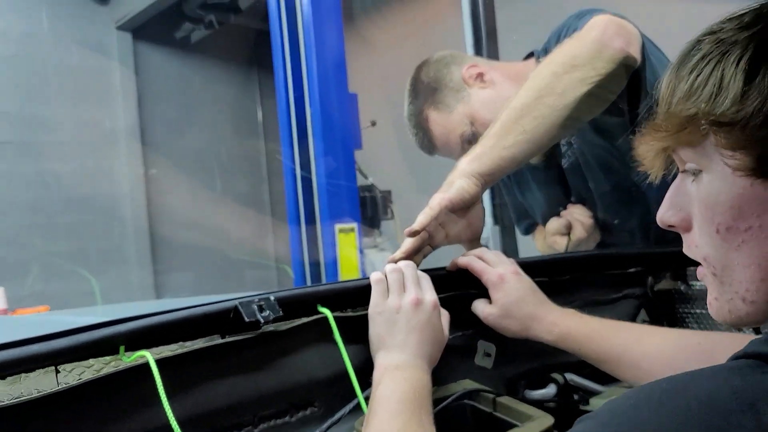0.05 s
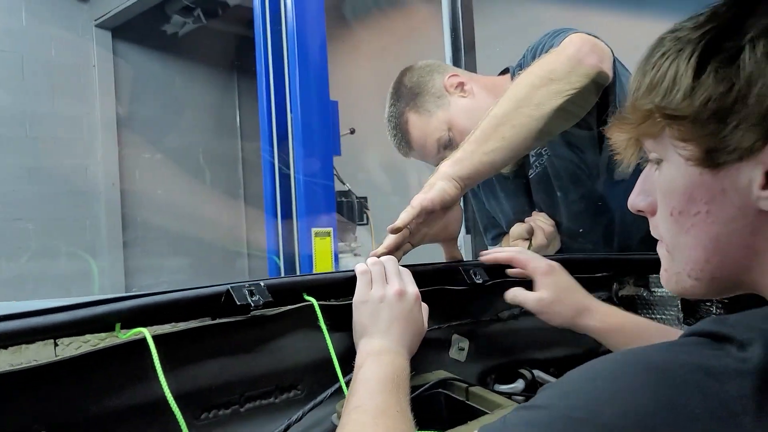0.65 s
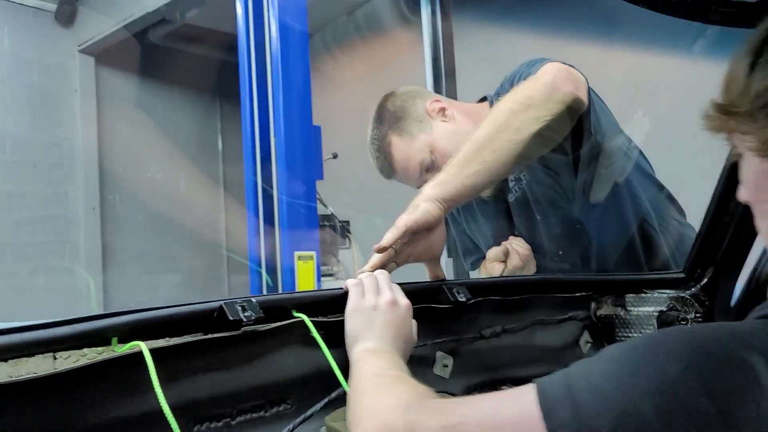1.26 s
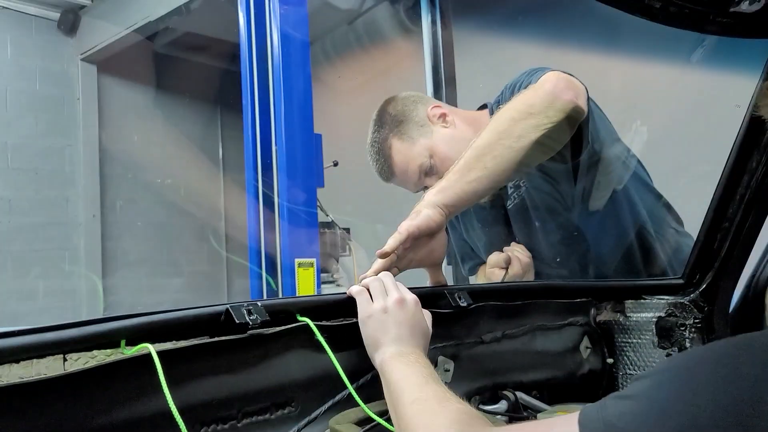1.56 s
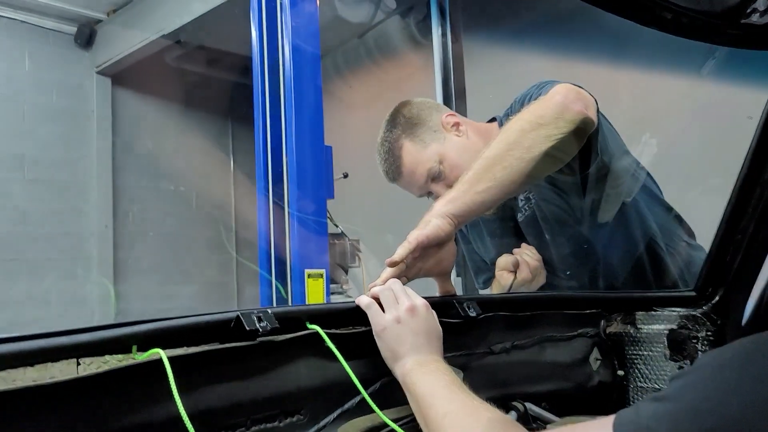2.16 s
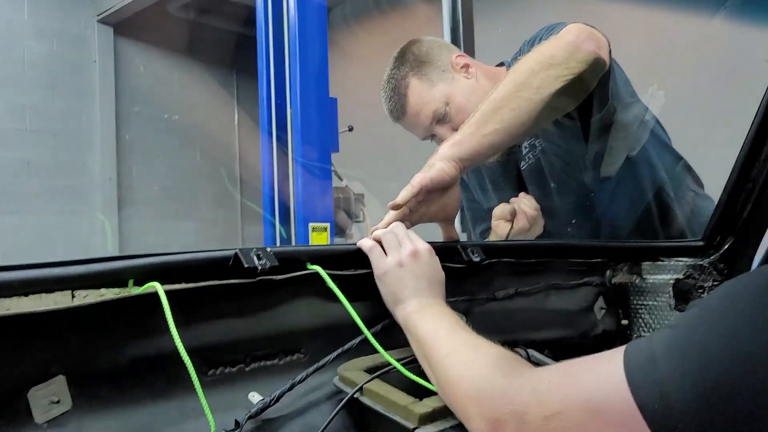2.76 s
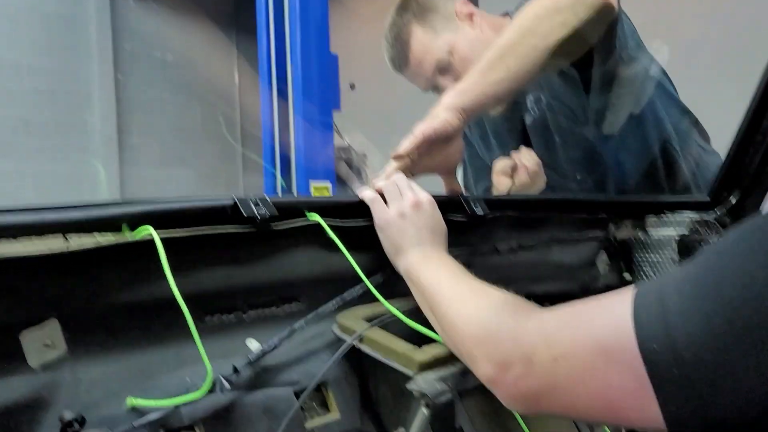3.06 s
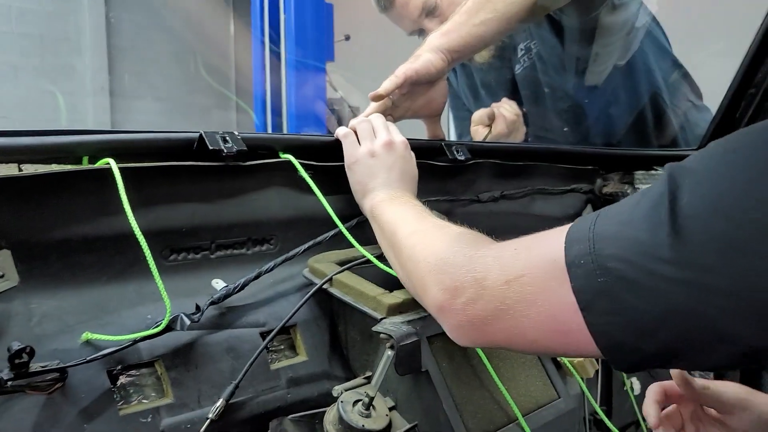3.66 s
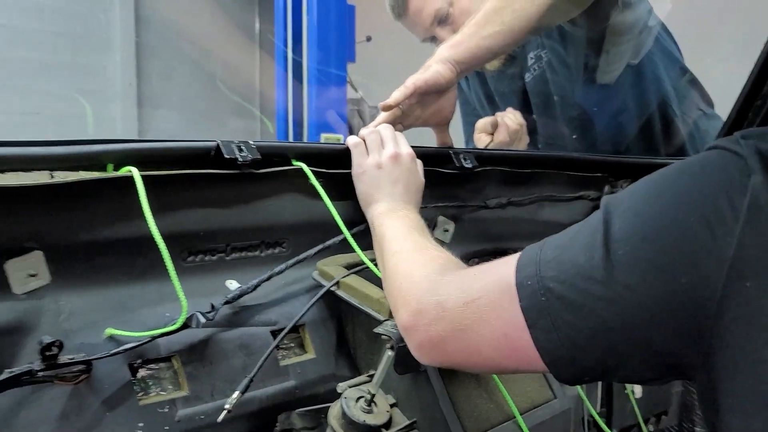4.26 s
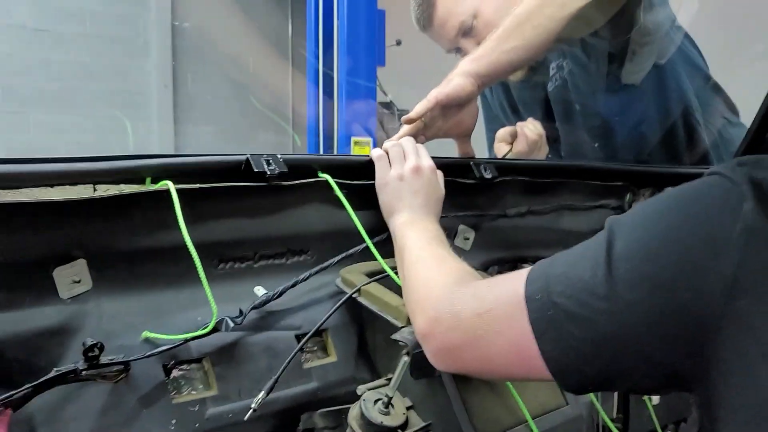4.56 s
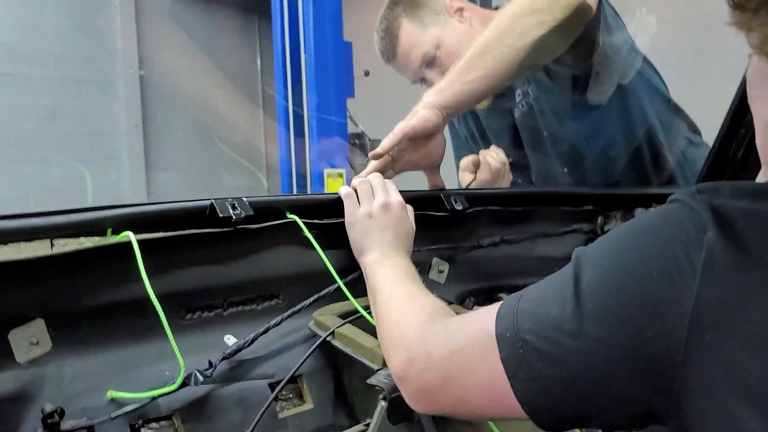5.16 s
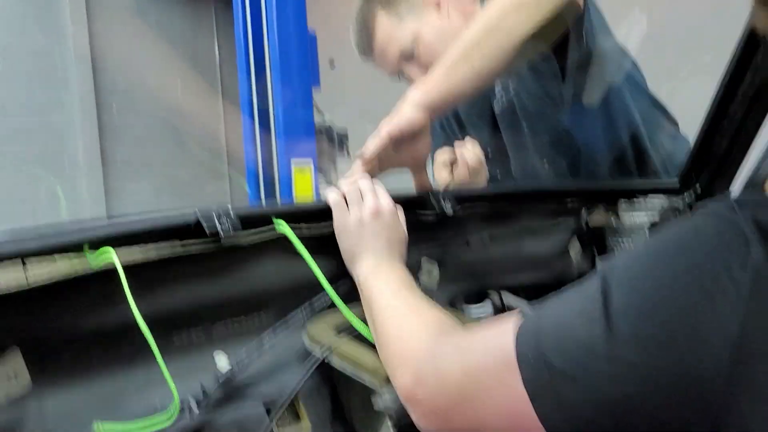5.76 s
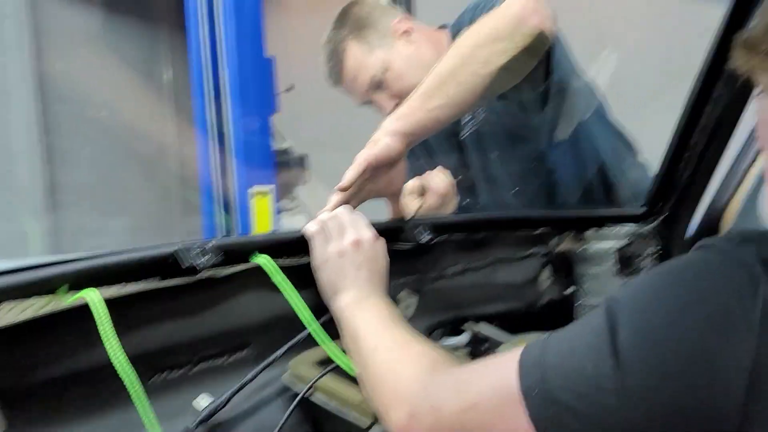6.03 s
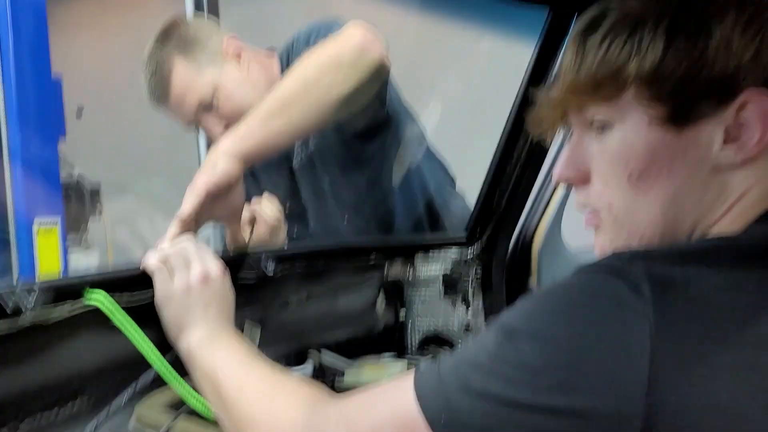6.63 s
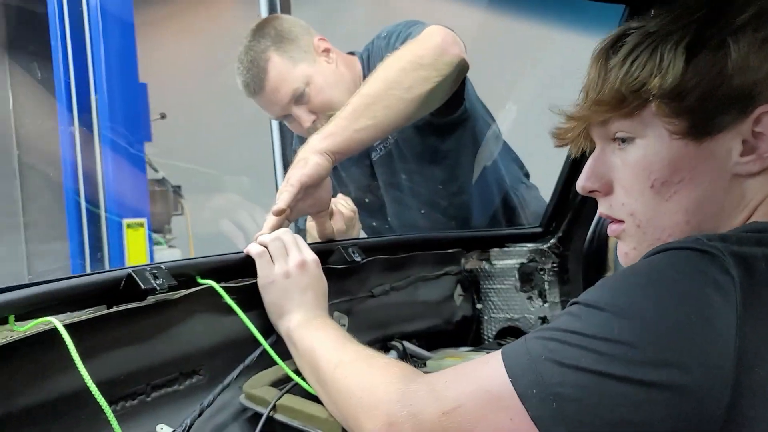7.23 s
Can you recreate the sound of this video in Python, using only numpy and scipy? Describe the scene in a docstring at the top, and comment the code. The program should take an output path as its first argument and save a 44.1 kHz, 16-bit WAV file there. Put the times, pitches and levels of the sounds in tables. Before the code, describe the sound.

A rubber seal is worked by hand onto a car windscreen, close to the microphone in a quiet workshop. Faint scratchy rubbing comes with ticks and small pops, then the pane gives a sharp, ringing knock. A finger slides over the left side of the microphone and presses it with a muffled bump. Softer scrapes, ticks and knocks follow, with low rumbles from the car body.

```python
"""Fitting a windscreen seal

A bare car body in a quiet workshop, heard from close by on a stereo microphone. Hands work a rubber
seal onto the edge of the glass: it rubs and scrapes in stick-slip strokes, ticks, and pops into its
seat. The pane knocks and rings; the body booms and rumbles as it is pushed. Early on, right at the
microphone, a finger slides over the left port and briefly presses on it."""
import sys
import numpy as np
from scipy import signal
from scipy.fft import rfft, irfft
from scipy.io import wavfile
from scipy.ndimage import uniform_filter1d

SR = 44100
rng = np.random.default_rng(int(sys.argv[2]) if len(sys.argv) > 2 else 0)


def to_wav(sig):
    """Store sig (one row per channel, or 1-D mono) as 16-bit WAV at the path in sys.argv[1].

    Samples outside -1..1 are clipped; the rate is SR.
    """
    pcm = np.clip(np.atleast_2d(sig), -1, 1) * 32767
    pcm = np.round(pcm).astype(np.int16)
    wavfile.write(sys.argv[1], SR, pcm.T)  # frames by channels


N = 325981
T = np.arange(N) / SR
RING_T = T[:SR * 3 // 4]  # time axis of one blow

# hiss spectrum of slipping skin: f/Hz, level/dB
SKIN_HISS = [(1500, -12), (4000, 11), (7500, 6), (9500, 0.5), (12000, 1.5), (16000, 0)]
# contact noise spectrum of a knock or pop: f/Hz, level/dB
CONTACT = [(25, -9.5), (90, 9.5), (200, 15.5), (700, -8.5), (1500, 8.5), (3300, -1), (5500, -9.5),
           (10000, -27.5)]


def rubbing():
    """Rubber on glass: a firm grip drags the rubber body along, a light one lets the skin slip and hiss."""
    # strokes: middle t/s, half length/s, level/dB, grip 0-1
    strokes = [(1.073, 0.084, -65.5, 0.45), (2.41, 0.094, -76, 1), (2.784, 0.018, -69.5, 0.3),
               (3.21, 0.25, -80, 0.29), (3.45, 0.15, -76, 1), (3.65, 0.052, -82.5, 0.05),
               (3.788, 0.059, -67.5, 0.18), (4.41, 0.029, -66.5, 0.98), (4.486, 0.032, -83, 0.06),
               (4.719, 0.061, -62, 0.46), (5.105, 0.047, -68, 0.55), (5.349, 0.071, -64, 0.4),
               (5.646, 0.022, -66.5, 0.6), (5.763, 0.067, -63.5, 0.46), (6.18, 0.074, -65, 0.54),
               (6.487, 0.077, -71, 0.85), (7.173, 0.24, -73, 0.64)]
    # spectrum of rubber on glass: f/Hz, level/dB
    rub_spectrum = [(400, -7), (1000, -1), (1500, 1), (3000, 0.5), (4300, -2.5), (6500, -6.5), (9000, -18),
                    (14000, -53)]
    # spectrum of the dragged rubber body: f/Hz, level/dB
    drag_spectrum = [(190, -29), (280, 4.5), (450, 12), (720, -1.5), (1300, -2), (3000, -20), (8000, -51)]
    friction, drag, skin = np.zeros((3, N))
    for s, half, db, grip in strokes:
        stroke = amp(db) * swell(s, half, shape=2.04)
        friction += stroke
        drag += stroke * amp(-13 + 20.5 * grip)
        skin += stroke * amp(13.5 - 52 * grip)
    rub = friction * colour(patchy(slips(16000, 0.42, 1.0, 0.04), patch_db=1.7), rub_spectrum)
    body = drag * colour(slips(4000, 0.98, 2.6, 0.93), drag_spectrum)
    hiss = skin * colour(patchy(slips(16000, 1.5, 1.0, 0.12), patch_db=4.0), SKIN_HISS)
    return rub * pan(-2.5) + body + hiss * pan(2.0)


def scrapes():
    """Quick slides of the rubber rasp, and some ring its hollow section."""
    # scrapes: middle t/s, level/dB, half length/s, centre f/Hz, hollow share 0-1, left over right/dB
    slides = [(1.034, -47, 0.013, 2380, 0, 3), (2.22, -61, 0.14, 2000, 0, 5),
              (2.368, -62.5, 0.085, 1900, 0, -5.5), (2.854, -68.5, 0.069, 2000, 0.24, -8),
              (3.409, -62, 0.021, 1920, 0, 1), (4.417, -56, 0.013, 2870, 0.65, -10.5),
              (5.774, -59.5, 0.048, 3250, 0.1, -5), (5.921, -63.5, 0.028, 3040, 0.1, -2.5),
              (5.99, -68, 0.016, 3000, 0.04, 16.5), (6.51, -65, 0.035, 1920, 0.3, -0.5)]
    # resonances of the hollow seal: f/Hz, width/Hz, level/dB
    seal_modes = [(450, 62, 0.5), (1222, 30, 8.5), (1840, 100, 6), (3160, 130, -6), (4100, 120, -8.5),
                  (6100, 700, -7.5), (7360, 550, -19)]
    hz = np.fft.rfftfreq(N, 1 / SR)
    grit = slips(per_s=9000, spread_db=0.5, clump_db=0.63, same=0.59)
    section = sum(amp(db) / (1 + ((hz - f) / (width / 2)) ** 2) for f, width, db in seal_modes)
    hollow = unit(irfft(rfft(grit) * section, N))
    out = np.zeros((2, N))
    for s, db, half, f, share, side_db in slides:
        rasp = colour(grit, [(f / 6, -17), (f / 1.12, -3), (f * 1.03, 0), (f * 1.77, -15), (f * 7, -48)])
        out += amp(db) * swell(s, half) * unit(share * hollow + (1 - share) * rasp) * pan(side_db)
    return out


def pops():
    """The seal drops into its seat with a puff of contact noise and a damped resonance."""
    # pops: t/s, level/dB, f/Hz, contact noise against the ring/dB
    seatings = [(0.549, -53, 379, -10), (.582, -51.5, 298, -12.5), (1.1479, -39, 486, -1.5),
                (1.212, -54, 510, -10), (1.241, -47, 376, -7.5), (1.311, -57, 540, -1),
                (1.719, -58, 395, -2), (2.551, -54.5, 248, -24), (3.478, -51.5, 846, -8),
                (4.356, -61, 428, 2.5), (5.01, -57.5, 354, -2.5)]
    decay_cycles = 46  # so low pops last longer
    out = np.zeros((2, N))
    for s, db, hz, contact_db in seatings:
        puff = soften(colour(noise(len(RING_T), 0.1), CONTACT), 5800)
        contact = amp(contact_db) * puff * dying(0.087, 0.0012)
        add(out, s, amp(db) * (damped(hz, decay_cycles / hz) + contact))
    return out


def ticks():
    """Nails and the lip of the seal snap on the glass."""
    # ticks: t/s, tone level/dB, f/Hz, t60/s, snap level/dB, left over right/dB
    flicks = [(0.104, -62, 1760, 0.24, -69, 3), (0.1389, -45.5, 2880, 0.035, -52, 4.5),
              (1.1486, -42, 2850, 0.039, -43, 5), (3.385, -62, 2340, 0.045, -83, 2),
              (3.464, -86, 3000, 0.11, -59, 1), (4.305, -57.5, 2880, 0.037, -86, -7),
              (6.559, -60, 5460, 0.015, -66, 6), (6.722, -79, 7000, 0.016, -61.5, -4),
              (7.25, -66.5, 6500, 0.21, -63, -1.5)]
    out = np.zeros((2, N))
    for s, db, hz, t60, snap_db, side_db in flicks:
        tone = colour(noise(len(RING_T), 0.17), [(hz / 2, -32), (hz, 0), (hz * 1.71, -28), (hz * 3, -45)])
        snap = colour(noise(len(RING_T), 0.12), [(500, 21), (4000, 5.4), (11000, 5.8), (16000, 2.5)])
        add(out, s, (amp(db) * tone + amp(snap_db) * snap) * dying(t60, 0.00013) * pan(side_db))
    return out


def knocks():
    """The pane bumps against its frame; a soft contact leaves out the high modes."""
    # knocks: t/s, level/dB, contact hardness as cutoff f/Hz, thud gain/dB
    blows = [(.153, -41.5, 2350, -14), (.855, -49.5, 1660, -9.5), (1.369, -29.5, 17000, -10.5),
             (3.894, -47.5, 1070, -14), (4.264, -59, 930, -10), (5.006, -55.5, 1250, -2)]
    # modes of the pane: f/Hz, level/dB, t60/s
    pane_modes = [(540, -11.5, 0.2), (622, -9, 0.32), (691, -8, 0.23), (744, -4, 0.09), (780, -18.5, 0.065),
                  (1317, -4.5, 0.13), (1385, -6.5, 0.042), (1490, -1, 0.066), (1920, -11, 0.13),
                  (2290, -5, 0.079), (3260, -2, 0.034)]
    # modes of the frame under it: f/Hz, level/dB, t60/s
    frame_modes = [(83, 2.5, 0.47), (105, 4, 0.21), (118, 4, 0.1), (186.5, -11, 0.75)]
    out = np.zeros((2, N))
    for s, db, hard_hz, thud_db in blows:
        crack = amp(-6.0) * colour(noise(len(RING_T), 0.73), CONTACT) * dying(0.15, 0.00063)
        glass = amp(-2.5) * ring(clusters(pane_modes), rise=0.0019, scatter=1.23)
        thud = amp(thud_db) * ring(frame_modes, rise=0.0073, scatter=0.2)
        add(out, s, amp(db) * (soften(glass + crack, hard_hz) + thud))
    return out


def bodywork():
    """The car body answers the pushing with sheet metal booms and dull thumps."""
    # pushes on a panel: t/s, level/dB
    booms = [(.235, -51.5), (4.601, -65.5)]
    # modes of that panel: f/Hz, level/dB, t60/s
    panel_modes = [(177, 2, 0.82), (268.4, -6, 0.65)]
    # thumps of the body: t/s, level/dB, f/Hz, t60/s
    thumps = [(1.243, -47.5, 108, 0.35), (5.021, -38, 41.3, 0.42)]
    out = np.zeros((2, N))
    for s, db in booms:
        add(out, s, sum(amp(db + mode_db) * damped(hz, t60) for hz, mode_db, t60 in panel_modes))
    for s, db, hz, t60 in thumps:
        add(out, s, amp(db) * damped(hz, t60))
    return out


def finger_slide():
    """Handling noise: skin creeps over the left port in short pushes; the right hears only a trace."""
    # pushes: middle t/s, half length/s, level/dB
    pushes = [(1.546, 0.0079, -62), (1.672, 0.04, -56.5), (1.929, .023, -54.5), (2.075, 0.028, -53.5),
              (2.146, 0.016, -45), (2.271, 0.025, -53.5), (2.573, 0.015, -61)]
    # spectrum of skin on the port: f/Hz, level/dB
    slide_spectrum = [(400, -23), (1000, -17), (1600, 1.5), (2900, 4.5), (5200, -1.5), (6500, -11),
                      (8200, -12.5), (10500, -46)]
    creep = amp(-62) * held(1.4, 2.1, rise_db_per_s=700, fall_db_per_s=700)
    slide = creep + sum(amp(db) * swell(s, half) for s, half, db in pushes)
    grit = patchy(slips(16000, 0.98, 0.52, 0.16), patch_db=2.5)
    hiss = amp(-60) * (slide / amp(-53)) ** 1.47  # faster sliding is brighter
    return (slide * colour(grit, slide_spectrum) + hiss * colour(grit, SKIN_HISS)) * amp([[0], [-16]])


def finger_press():
    """The finger presses on the left port and traps air in it."""
    # presses: t/s, hold/s, level/dB, rise/(dB/s)
    presses = [(2.154, 0.075, -30, 432), (2.56, 0.011, -64.5, 1208)]
    # spectrum of the covered port: f/Hz, level/dB
    press_spectrum = [(15, -23), (50, 1), (110, -5.5), (165, -11.5), (420, -11), (1000, -18), (1450, -12),
                      (2900, -19.5), (3600, -29.5), (8000, -50.5), (16000, -59.5)]
    # pressure pulses as the port is sealed: t/s, level/dB, half length/s
    bumps = [(2.1512, -13.5, 0.0018), (2.169, -17.5, 0.0034)]
    air = colour(slips(12000, 0.88, 0.3, 0.98)[0], press_spectrum)
    out = np.zeros((2, N))
    for s, hold, db, rise in presses:
        squeeze_db = 10 * swell(s, 0.0097)  # trapped air rushes out as the press lands
        out[0] += amp(db + squeeze_db) * held(s, s + hold, rise, fall_db_per_s=384) * air
    for s, db, half in bumps:
        out[0] -= amp(db) * (1 - ((T - s) / half) ** 2) * swell(s, half)
    return out


def cabin(x, positions=4):
    """Glass and bare metal close by make the rubber sound hollow, shifting as the hands move."""
    turn_hz = 0.4447
    fades = (np.maximum(np.cos(2 * np.pi * (turn_hz * T + k / positions)), 0) for k in range(positions))
    return sum(reflections(x * fade ** 1.5) for fade in fades)


def reflections(x):
    """Direct sound and quick echoes for one position of the hands."""
    t = T[:SR // 40]
    taps = rng.standard_normal((2, len(t))) * (rng.random(len(t)) < 1500 / SR) * np.exp(-t / 0.0063)
    taps = 1.64 * taps / np.linalg.norm(taps, axis=1, keepdims=True)
    taps[:, 0] = 1  # straight path to the microphone
    return signal.oaconvolve(x, taps / np.linalg.norm(taps[0]), axes=1)[:, :N]


def workshop(x):
    """Diffuse tail from the walls farther off, each band dying at its own speed."""
    # reverberation time: f/Hz, t60/s
    decay = [(100, 0.98), (2000, 0.69), (15000, 0.5)]
    taps = rng.standard_normal((2, SR)) * (rng.random((2, SR)) < 3000 / SR) * (T[:SR] > .006)
    hz, t, bands = signal.stft(taps, SR, nperseg=256)
    tail = signal.istft(bands * amp(-60 * t / read(decay, hz)[:, None]), SR, nperseg=256)[1]
    return signal.fftconvolve(x, tail / np.linalg.norm(tail[0]), axes=1)[:, :N]


def rumble():
    """The car body rumbles low as weight shifts against it."""
    # leans: middle t/s, half length/s, level/dB
    leans = [(3.1, 0.028, -62.5), (4.176, 0.14, -56.5), (4.801, 0.1, -57.5), (5.407, 0.085, -52.5),
             (6.843, 0.055, -56.5), (7.281, 0.053, -56)]
    # spectrum of the swaying body: f/Hz, level/dB
    body_spectrum = [(20, -16), (45, 0.5), (68, -7.5), (100, -27.5), (200, -31.5), (500, -103)]
    sway = sum(amp(db) * swell(s, half) for s, half, db in leans)
    return sway * colour(noise(N, 0.95), body_spectrum)


def room_tone():
    """Steady air of the quiet workshop."""
    # spectrum of the air: f/Hz, level/dB
    air_spectrum = [(20, -8), (45, 3.5), (70, 1), (155, -17), (350, -16.5), (1050, -28), (2600, -26),
                    (3500, -33.5), (5200, -33.5), (9400, -46.5), (16000, -47.5)]
    return amp(-64) * colour(noise(N, 0.47), air_spectrum) * pan(0.65)


def slips(per_s, spread_db, clump_db, same):
    """Stick-slip friction: a dense train of tiny clicks of uneven size, bunched in clumps."""
    size = amp(spread_db * np.minimum(rng.exponential(1, (3, N)), 4))
    clicks = size * rng.standard_normal((3, N)) * (rng.random((3, N)) < per_s / SR)
    clumps = unit(uniform_filter1d(uniform_filter1d(rng.standard_normal(N), size=300), size=200))
    return unit(pair(clicks, same) * amp(clump_db * clumps))


def patchy(x, patch_db):
    """Skin catches and lets go unevenly: the colour of the friction shifts in short patches."""
    bands = signal.stft(x, nperseg=512)[2]
    patches = uniform_filter1d(rng.standard_normal(bands.shape[1:]), size=11, axis=0)
    patches = unit(uniform_filter1d(patches, size=6, axis=1))
    return unit(signal.istft(bands * amp(patch_db * patches), nperseg=512)[1][:, :N])


def clusters(modes, count=5, split=0.0534):
    """The pane rests loosely on the seal, so each mode splits into close partials that beat."""
    return [(hz * (1 + split * rng.uniform(-1.04, 1)), db - 10 * np.log10(count), t60)
            for hz, db, t60 in modes for _ in range(count)]


def ring(modes, rise, scatter):
    """Dying modes; each reaches the two ports with its phase scattered (radians)."""
    return sum(amp(db) * dying(t60, rise)
               * np.sin(2 * np.pi * hz * RING_T + scatter * rng.standard_normal((2, 1)))
               for hz, db, t60 in modes)


def damped(hz, t60):
    """One resonance and a dull crowd of modes round it."""
    spectrum = [(hz / 4, -30), (hz, 0), (hz * 2.16, -10), (hz * 5, -55), (SR / 2, -100)]
    crowd = amp(-8.0) * colour(noise(len(RING_T), 1.0), spectrum)
    rise = .5 / hz  # half a cycle
    return ring([(hz, 0, t60)], rise, scatter=0.14) + crowd * dying(t60, rise)


def swell(s, half, shape=2):
    """Bell-shaped envelope of a stroke that speeds up and slows down again."""
    return np.exp(-np.minimum(abs((T - s) / half), 10) ** shape / 2)


def held(start, end, rise_db_per_s, fall_db_per_s):
    """Attack, hold and release."""
    return amp(-rise_db_per_s * np.maximum(start - T, 0) - fall_db_per_s * np.maximum(T - end, 0))


def dying(t60, rise):
    """Envelope of a blow; times in seconds."""
    return amp(-60 * RING_T / t60) * (1 - np.exp(-RING_T / rise))


def noise(size, same):
    """Stereo white noise."""
    return pair(rng.standard_normal((3, size)), same)


def pair(x, same):
    """Three unrelated signals become two channels with the share `same` of their power in common."""
    return np.sqrt(same) * x[0] + np.sqrt(1 - same) * x[1:]


def colour(x, points):
    """Gives x a spectrum, at rms 1."""
    size = x.shape[-1]
    gain = amp(read(points, np.fft.rfftfreq(size, 1 / SR)))
    return unit(irfft(rfft(x) * gain, size))


def read(points, hz):
    """Joins points on a log-frequency axis."""
    f, value = np.transpose(points)
    return np.interp(np.log(hz + 1), np.log(f + 1), value)


def soften(x, hz):
    """Two-pole low-pass."""
    return signal.sosfilt(signal.butter(2, hz, fs=SR, output="sos"), x)


def add(mix, s, sound):
    """Mixes a sound in at s seconds."""
    part = mix[:, round(s * SR):][:, :sound.shape[-1]]
    part += sound[..., :part.shape[1]]


def pan(db):
    """Channel gains, left over right by db."""
    return amp(np.array([[db], [-db]]) / 2)


def amp(db):
    return 10 ** (np.asarray(db) / 20)


def unit(x):
    return x / np.sqrt(np.mean(x ** 2) + 1e-20)


def scene():
    """At the microphone: the work close up, handling noise on the left, the workshop behind."""
    blows = knocks()
    seating = pops() + bodywork() + ticks()
    scraped = cabin(scrapes())
    handling = finger_slide() + finger_press()
    echo = workshop(amp(-9.5) * blows + amp(-18.5) * (seating + scraped) + amp(-39.5) * handling[0])
    return cabin(rubbing()) + scraped + seating + blows + handling + echo + room_tone() + rumble()


def record(dry):
    """The recorder's band limit."""
    band_limit = signal.firwin(511, cutoff=15850, window=("kaiser", 9), fs=SR)
    return signal.oaconvolve(dry, band_limit[None], "same")


dry = scene()
out = record(dry)
to_wav(out)
```